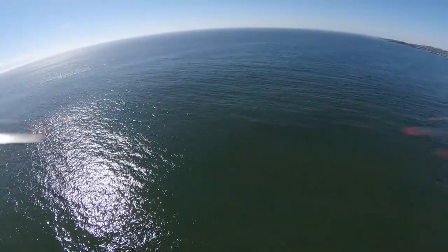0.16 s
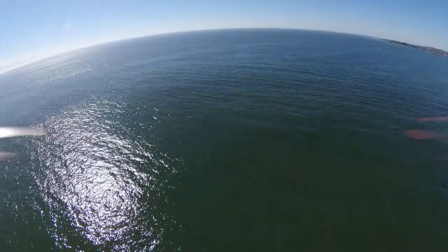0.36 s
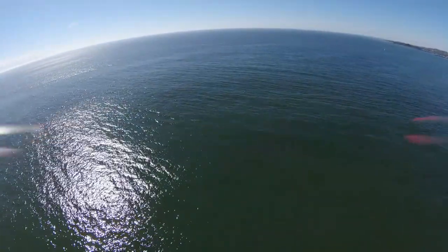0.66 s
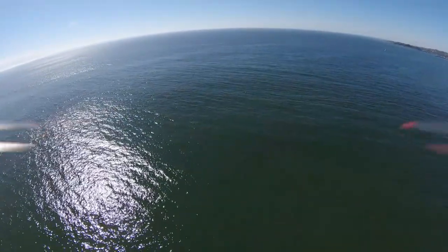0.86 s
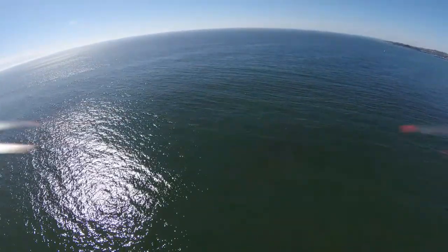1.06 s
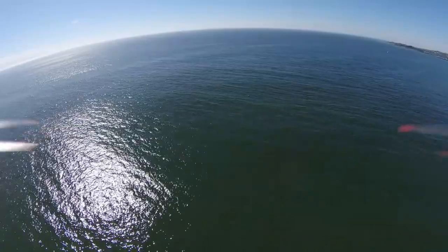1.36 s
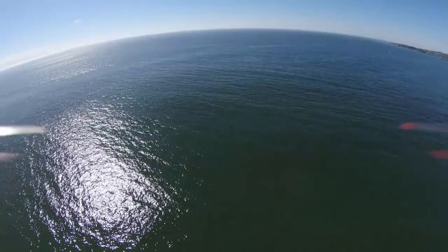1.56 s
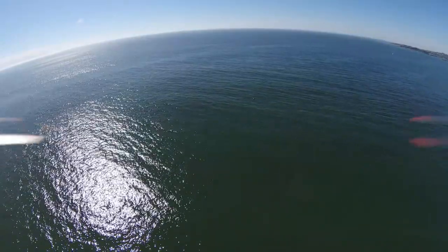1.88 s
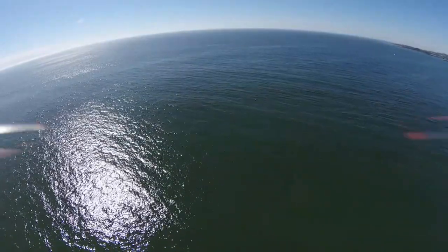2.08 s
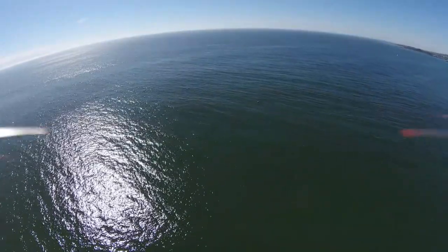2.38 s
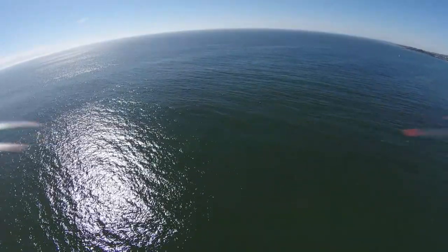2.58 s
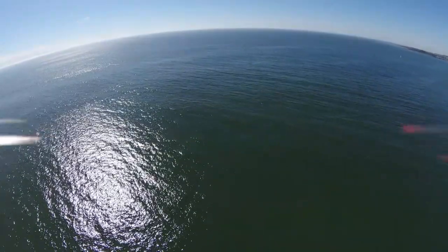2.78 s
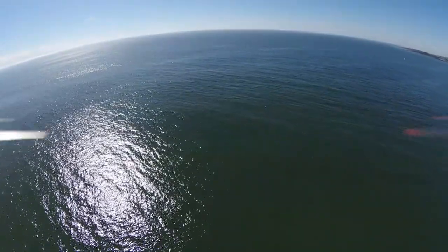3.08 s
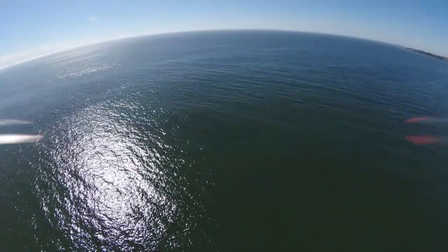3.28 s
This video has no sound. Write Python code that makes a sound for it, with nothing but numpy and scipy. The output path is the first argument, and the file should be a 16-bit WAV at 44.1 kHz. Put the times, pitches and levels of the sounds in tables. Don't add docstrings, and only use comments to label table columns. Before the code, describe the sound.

A drone's buzzing propellers slow down, drone on evenly, then rev higher over open sea

```python
import sys
import numpy as np
from scipy import signal
from scipy.fft import rfft, irfft, next_fast_len
from scipy.io import wavfile
from scipy.ndimage import uniform_filter1d, map_coordinates

SR = 44100
rng = np.random.default_rng(int(sys.argv[2]) if len(sys.argv) > 2 else 0)


def file_out(sig):
    cols = np.atleast_2d(sig).T
    lim = np.clip(cols, -1, 1)
    pcm = np.round(lim * 32767).astype(np.int16)
    wavfile.write(sys.argv[1], SR, pcm)


def nominal_scale(level):
    x = np.asarray(level, float) / 20
    return 10 ** x


N = 151704

# (time [s], speed of rotors 1, 2, 3, 4 [turns per second])
SHAFT_SPEEDS = [(0.0, 219.0, 233.1, 219.2, 194.0), (0.06, 217.9, 233.3, 217.7, 194.0),
                (0.13, 209.8, 224.3, 210.1, 185.6), (0.24, 206.0, 222.1, 206.8, 185.8),
                (0.41, 200.4, 218.9, 209.1, 186.7), (0.56, 182.0, 199.6, 191.4, 170.6),
                (0.7, 171.7, 191.8, 189.8, 168.6), (0.87, 172.1, 192.2, 187.1, 165.7),
                (1.05, 165.2, 189.5, 186.6, 164.3), (1.5, 163.0, 193.6, 188.6, 159.2),
                (2.1, 162.5, 196.0, 186.3, 156.0), (2.7, 161.5, 197.9, 184.7, 155.2),
                (2.79, 183.7, 224.1, 211.9, 175.2), (2.92, 193.9, 237.8, 226.9, 189.7),
                (3.16, 200.2, 241.7, 233.3, 201.3), (3.27, 216.4, 259.4, 250.3, 217.8),
                (3.37, 215.6, 258.4, 252.3, 226.1), (3.44, 202.4, 246.8, 249.6, 214.0)]
CRUISE_HZ = [162, 197, 186, 156]
# (multiple of its speed, level at cruise of rotors 1, 2, 3, 4 [dB])
ROTOR_TONES = [(1, -61, -59.5, -65, -64), (2, -68.5, -66, -75, -66.5), (3, -46.5, -45.5, -51, -62.5),
               (4, -72.5, -70.5, -67, -73), (5, -78.5, -74, -67, -71.5), (6, -47, -58.5, -62.5, -55.5),
               (7, -74.5, -60, -64.5, -74), (8, -64, -58.5, -59, -66.5), (9, -52.5, -56, -64.5, -56.5),
               (10, -58.5, -60.5, -64.5, -62.5), (11, -67.5, -59, -56.5, -62.5), (12, -60, -53.5, -63, -66),
               (13, -56, -54, -57, -66.5), (14, -55, -57.5, -52.5, -57.5), (15, -64, -65.5, -62, -57.5),
               (16, -78, -64.5, -69, -65), (17, -62.5, -71, -76, -68.5), (18, -61, -68.5, -79, -74),
               (19, -72, -64.5, -83, -77.5), (20, -71, -65, -64, -75), (21, -63, -51.5, -58, -65.5)]
# (multiple of bearing speed, level at cruise [dB])
BEARING_TONES = [(10, -62.5), (11, -66.5), (12, -51.5), (13, -60), (14, -58), (15, -60), (16, -53),
                 (17, -59), (18, -63.5), (19, -69), (20, -55)]
WHINE_DB = [-36, -37, -39, -49]
ROTOR_PAN_DB = [-2, 4.5, -0.5, 3]
WHINE_PAN_DB = [2, 10, -12, 2]
BLADE_GROWTH = [11, 17, 13, 19]
OVERTONE_GROWTH = [15, 32, 32, 19]
# (pitch [Hz], width [Hz], boost [dB])
FRAME_RINGS = [(700, 200, 1), (1200, 90, 4), (1550, 60, 3), (2280, 100, 4), (2900, 100, 2.5), (3150, 80, 2)]
# (pitch [Hz], level [dB])
WASH_COLOUR = [(20, -14.5), (60, -4.5), (180, -3), (420, -6), (800, -7.5), (1450, 0), (2000, -11),
               (3000, -6)]
# (pitch [Hz], likeness [1 = same])
WASH_LIKENESS = [(60, .55), (300, .5), (900, .65), (1800, .35), (3200, .3)]
# (pitch [Hz], left over right [dB])
MIC_TILT = [(100, -1.5), (600, -1.5), (1000, -3), (1600, -3.5), (2400, -5), (3500, -4.5), (5000, -9)]
# (pitch [Hz], left ahead of right [radians])
MIC_LEAD = [(100, .1), (600, 0.62), (1400, -.1), (2000, 1.61), (3000, 1.55), (9000, 2.5)]
# (pitch [Hz], level [dB])
MUFFLE = [(2900, 1), (3150, -0.5), (3350, -3.5), (3600, -15), (3850, -28), (4050, -33), (4200, -64.5),
          (4400, -120)]
# (pitch [Hz], width [Hz], level [dB])
LEAKS = [(4650, 90, -55), (5550, 220, -43), (6800, 280, -49), (8150, 350, -54), (9600, 450, -63)]

BLADES = 3
STEP = 128


def along(points, hz):
    f, value = np.transpose(points)
    return np.interp(np.log(hz + 1), np.log(f + 1), value)


def bumps(rows, hz):
    return sum(height * np.exp(-0.5 * ((hz - centre) / width) ** 2) for centre, width, height in rows)


def wobble(rate, step=1):
    knots = rng.standard_normal(int(rate * N / SR) + 4)
    return map_coordinates(knots, [np.arange(0, N, step) * rate / SR], order=1)


def filtered(x, response):
    m = next_fast_len(N + SR // 4)
    hz = np.fft.rfftfreq(m, 1 / SR)
    return irfft(rfft(x, m) * response(hz), m)[..., :N]


def shafts():
    time, *speeds = np.transpose(SHAFT_SPEEDS)
    hz = np.array([np.interp(np.arange(N) / SR, time, speed) for speed in speeds])
    hz = uniform_filter1d(hz, size=SR // 25, axis=1, mode="nearest")
    hz = hz * (1 + np.array([0.0016 * wobble(9) + 0.0016 * wobble(45) for _ in speeds]))
    return hz, 2 * np.pi * np.cumsum(hz, axis=1) / SR


def wash(hz, angle):
    level_db, growth_db, gust_db = -43.5, 3.5, 0.25
    patchy_db, chop = 0.4, 0.25
    z = signal.stft(rng.standard_normal((2, N)), nperseg=512)[2]
    patches = rng.standard_normal(z.shape[1:])
    patches = uniform_filter1d(patches, size=5, axis=0)
    patches = uniform_filter1d(patches, size=10, axis=1)
    patches = patches / np.sqrt(np.mean(patches ** 2) + 1e-20)
    air = signal.istft(z * nominal_scale(patchy_db * patches), nperseg=512)[1][:, :N]
    air = air * (1 + chop * np.cos(BLADES * angle).sum(0) / 2)

    def colour(f):
        turn = np.arccos(np.clip(along(WASH_LIKENESS, f), -1, 1)) / 2
        return nominal_scale(along(WASH_COLOUR, f)) * np.array([np.cos(turn), np.sin(turn)])

    mid, side = filtered(air, colour)
    low_mid, low_side = filtered(np.array([mid, side]), lambda f: f < 3000)
    loudness = np.sqrt(np.mean(low_mid ** 2 + low_side ** 2))
    effort_db = growth_db * np.log2(hz.mean(0) / np.mean(CRUISE_HZ))
    level = nominal_scale(level_db + effort_db + gust_db * wobble(3.107))
    return level * np.array([mid + side, mid - side]) / loudness


def tone(multiple, hz, angle, cruise_hz, level_db, growth_db, pan_db):
    pitch, cruise_pitch = multiple * hz[::STEP], multiple * cruise_hz
    frame_db = bumps(FRAME_RINGS, pitch) - bumps(FRAME_RINGS, cruise_pitch)
    flutter_db = 2.2 * np.clip(pitch / 1500 - 0.3, 0.3, 1) * wobble(22, step=STEP)
    db = level_db + growth_db * np.log2(pitch / cruise_pitch) + frame_db + flutter_db
    level = np.interp(np.arange(N), np.arange(0, N, STEP), np.sqrt(2) * nominal_scale(db))
    uneven = rng.standard_normal(2) / (1 + (1600 / cruise_pitch) ** 4)
    pan_db = pan_db + 3.5 * uneven[0]
    lead = 0.52 * uneven[1]
    spin = multiple * angle + rng.uniform(0, 2 * np.pi)
    return np.array([nominal_scale(side * pan_db / 2) * level * np.sin(spin + side * lead / 2) for side in (1, -1)])


def bearing(hz, angle):
    out = np.zeros((2, N))
    for k, db in BEARING_TONES:
        out += tone(k * 1.097, hz[0], angle[0], CRUISE_HZ[0], db, 2.5, ROTOR_PAN_DB[0])
    return out


def rotors(hz, angle):
    out = np.zeros((2, N))
    for r in range(len(hz)):
        shaft = hz[r], angle[r], CRUISE_HZ[r]
        for k, *levels in ROTOR_TONES:
            growth = 2.5
            if k == BLADES:
                growth = BLADE_GROWTH[r]
            elif BLADES < k <= 6:
                growth = OVERTONE_GROWTH[r]
            out += tone(k, *shaft, levels[r], growth, ROTOR_PAN_DB[r])
        out += tone(42, *shaft, WHINE_DB[r], 12, WHINE_PAN_DB[r])
    return out


def scene():
    hz, angle = shafts()
    return wash(hz, angle) + bearing(hz, angle) + rotors(hz, angle)


def roll_off(x):
    return signal.sosfilt(signal.butter(12, 10100, fs=SR, output="sos"), x)


def record(dry):
    leaks = [(centre, width, nominal_scale(db)) for centre, width, db in LEAKS]

    def microphones(f):
        left = nominal_scale(along(MIC_TILT, f) / 2) * np.exp(0.5j * along(MIC_LEAD, f))
        return np.array([left, 1 / left]) * (nominal_scale(along(MUFFLE, f)) + bumps(leaks, f))

    return roll_off(filtered(dry, microphones))


dry = scene()
out = record(dry)
file_out(out)
```